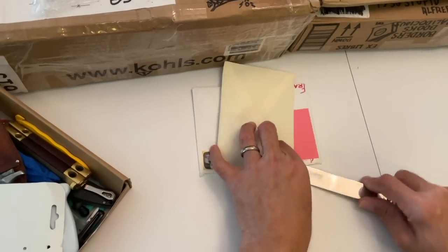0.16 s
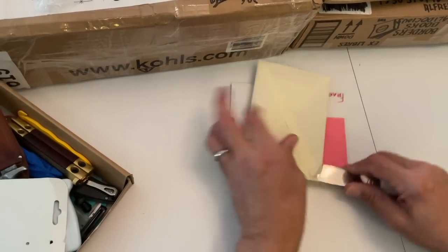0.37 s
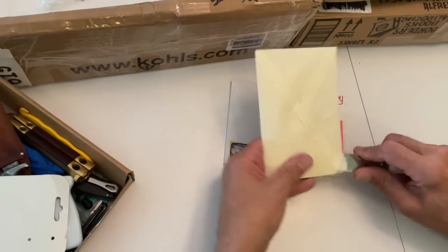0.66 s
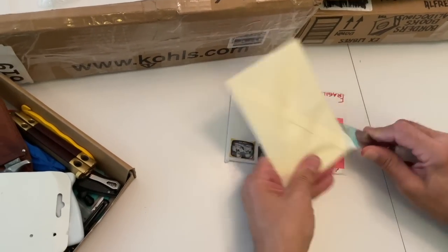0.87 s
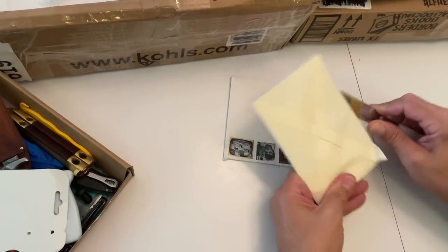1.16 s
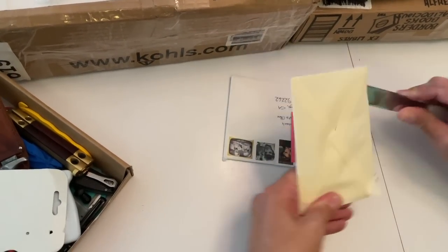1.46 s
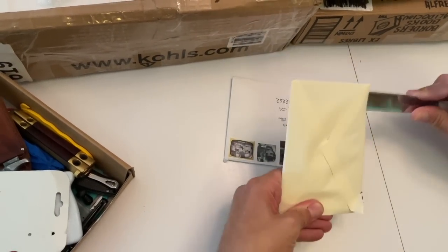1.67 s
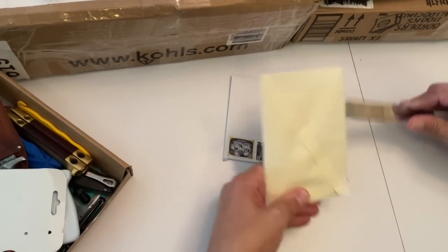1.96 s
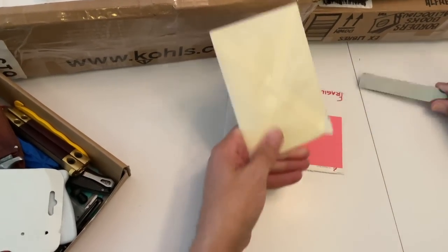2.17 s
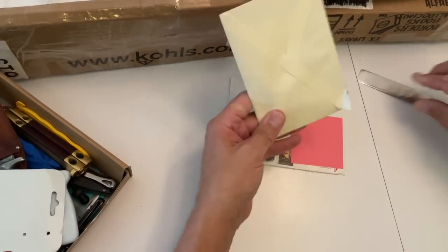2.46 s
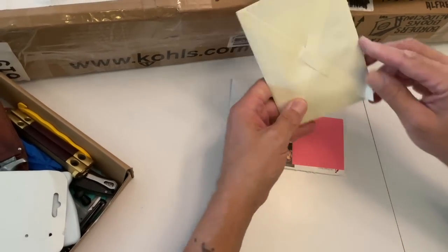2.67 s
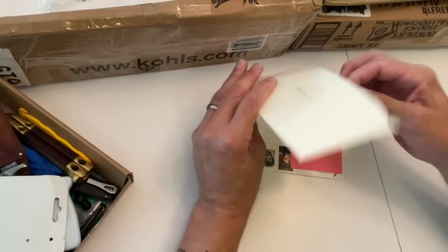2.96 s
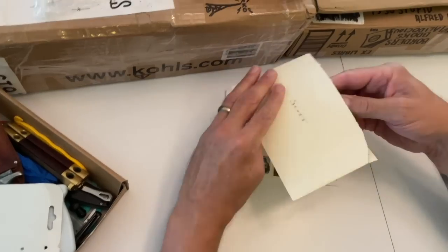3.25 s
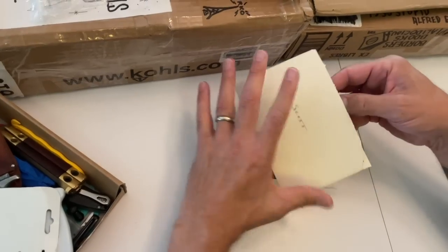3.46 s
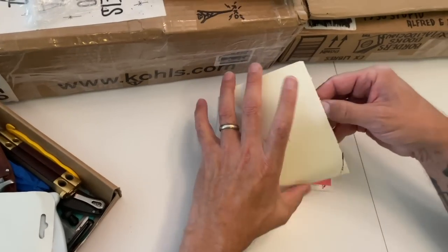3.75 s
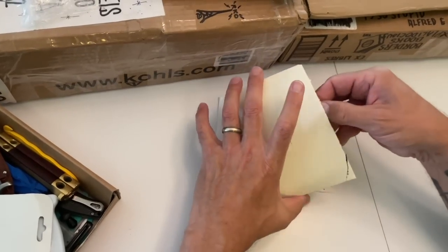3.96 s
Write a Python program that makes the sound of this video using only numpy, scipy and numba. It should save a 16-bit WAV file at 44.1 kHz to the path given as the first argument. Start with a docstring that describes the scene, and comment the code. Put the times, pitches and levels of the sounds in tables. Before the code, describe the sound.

Close up in a small quiet room, a thin blade rips an envelope in quick uneven rasps, thickest around one second. After a brief paper pop, the blade is dropped on a table with bright clinks and woody knocks. Then the envelope is turned, flexing with crisp snaps and light rustle over a faint low rumble.

```python
"""Letter opener and envelope

A flat steel letter opener saws an envelope open in jerks: rubbed and torn fibres drive resonances of the sheet.
The blade is dropped and bounces, so micro-contacts ring the damped modes of steel and table top.
Fingers turn the envelope, which slides and snaps as the sheet buckles.
Low resonant noise rumbles in a small room, which returns a short diffuse tail; the microphone is close."""
import sys
import numpy as np
from scipy import signal
from scipy.io import wavfile
from scipy.ndimage import uniform_filter1d
from numba import njit

SR = 44100
rng = np.random.default_rng(int(sys.argv[2]) if len(sys.argv) > 2 else 0)


def generate_wav(signal):
    """Clip the signal to [-1, 1] and save it as 16-bit WAV at the path in sys.argv[1]."""
    frames = np.transpose(np.atleast_2d(signal))
    scaled = np.clip(frames, -1, 1) * 32767
    pcm = np.round(scaled).astype(np.int16)
    wavfile.write(sys.argv[1], SR, pcm)


N = 181515  # length in samples

# low noise of the house: (time [s], level [dB])
RUMBLE_LEVEL = [(0.0, -44), (0.31, -40), (0.82, -45), (2.07, -43), (2.21, -36), (2.39, -46), (2.53, -46),
                (2.59, -42), (3.55, -40), (4.11, -44.5)]
# broad resonances of that noise: (centre [Hz], width [Hz], level [dB])
RUMBLE_RESONANCES = [(30.2, 20, -25.5), (58.6, 33, -7), (83.6, 27.6, -2.5), (117.2, 31, -5.5),
                     (155.5, 53, -6), (227, 115, -12.5)]
# the blade meets the table:
# (time [s], clack [dB], steel ring [dB], table knock [dB], dense first contact [ms])
BOUNCES = [(2.164, -13, -6.5, -15.5, 4.5), (2.195, 3.5, -27, -10.5, 4.8), (2.209, -11, -29, -6.5, 8.2),
           (2.269, -20, -40, -39, 8), (2.297, -13.5, -48, -13.5, 3.6), (2.408, -31, -5.5, -22.5, 19.5),
           (2.458, -26, -11.5, -17, 13.4), (2.483, -26, -14, -17, 12), (2.504, -7.5, -38, 0.5, 5.2),
           (2.517, -14, 4.5, -9, 6.2), (2.613, -24, -13, -18, 3.2), (2.625, -36, -25, -19, 2.14),
           (2.722, -52, -45, -31, 4), (2.805, -54, -44, -37, 5), (2.853, -55, -53, -35.5, 5)]
# modes of the blade, before its decay and gain factors: (frequency [Hz], width [Hz], level [dB])
STEEL_MODES = [(3520, 43, -11), (4210, 99, -14), (4750, 200, -11), (5310, 63, -12), (6260, 39, -14),
               (6890, 53, -2), (7360, 56, -8), (7780, 38, -7), (8770, 84, -13), (9520, 57, -14),
               (9870, 39, -6), (10800, 57, -12), (12200, 96, -4), (12500, 140, -12), (12700, 59, -12),
               (13700, 79, 0), (14500, 47, -18), (15200, 110, -11)]
# modes of the table top, before its decay factor: (frequency [Hz], width [Hz], level [dB])
TABLE_MODES = [(285.5, 27, 4), (571, 39, -2.5), (870, 19.3, -8), (1176, 39, -3), (1498, 52, -2),
               (1818, 40, -6.5), (2080, 69, -7.5), (2390, 92, -11.5), (2890, 110, -21)]
# the sheet buckles: (time [s], level [dB], centre of the modes [Hz], crack [dB re level], thump [dB re level]);
# fixed offsets are added to crack and thump
SNAPS = [(0.02, -24.5, 1434, -13, -21), (0.28, -21.5, 1590, 1.5, -3.5), (0.298, -24.5, 1420, 0, -17),
         (0.548, -28, 2300, -15, -23), (0.578, -15, 1180, -14, -26), (1.895, -18, 735, -9.5, -26),
         (1.972, -25, 1360, -19, -10), (2.002, -8.5, 846, -10, -40), (2.898, -13, 1204, -47, -14.5),
         (3.016, -7, 1200, -24, -16), (3.059, -11.5, 1517, -4, -34), (3.087, -10, 950, -10, -39),
         (3.197, -22, 1380, -37, -20), (3.282, -25.5, 1740, -10, -20), (3.324, -13.5, 770, -26, -19.5),
         (3.479, -22.5, 720, -21, -23), (3.518, -20.5, 1944, -40, -18), (3.553, -17.5, 1036, -17, -12.5),
         (3.57, -26, 935, -11, -14), (3.612, -21.5, 1590, -33, -16), (3.784, -15.5, 1737, -31, -30),
         (3.92, -22.5, 1027, -23, -21), (4.026, -8, 1675, -15, -31.5), (4.101, -8.5, 1215, -3.5, -40)]
# paper sliding on paper, skin and steel:
# (time [s], level [dB], body of the sheet [dB re level], fine hiss [dB re level])
SLIDE = [(0.0, -44.5, -4, -6), (0.165, -58.5, -5, -9), (0.301, -28, -9.5, -0.5), (0.41, -58, -7.5, -5),
         (0.47, -44, -18, -2.5), (0.54, -50.5, -23, -2), (0.6, -35.5, -13, -4), (0.68, -36, -15, -4.5),
         (0.75, -44.5, -9.5, -5), (1.1, -39, -1, -5.5), (1.21, -49, -1.5, -10), (1.45, -43.5, -2.5, -8),
         (1.79, -49, -2.5, -7.5), (1.83, -61, -3, -7), (2.05, -53.5, 2, -11), (2.15, -41, -16, -1),
         (2.36, -53, -1, -8), (2.72, -51, -4, -6), (2.85, -59.5, 0.5, -6.5), (2.97, -42.5, 1, -4),
         (3.12, -38.5, -1, -7), (3.22, -48, 2.5, -10), (3.3, -41.5, -3.5, -8), (3.43, -52, -6, -10),
         (3.5, -48.5, 2, -10), (3.76, -49, -5.5, -10), (3.83, -44.5, -10, 2), (3.94, -49, 0, -11),
         (4.112, -30.5, -12.5, -3)]
# jerks of the blade and tugs at the sheet: (start [s], length [ms], level [dB], body [dB re level])
JERKS = [(0.06, 58.6, -31, -9), (0.179, 24, -45.5, -2), (0.55, 20.6, -32, -7.5), (0.768, 75, -20.5, -4.5),
         (0.872, 19, -33.5, -11), (0.996, 31.4, -21.5, -8), (1.024, 19, -17, -9), (1.05, 16, -15.5, -10),
         (1.064, 24.4, -14, -19), (1.1, 15.7, -13, -13.5), (1.12, 20.3, -19.5, -11),
         (1.137, 43.5, -23.5, -8), (1.24, 18, -34.5, -4.5), (1.262, 130, -25, -6.5), (1.432, 31, -39.5, -5),
         (1.477, 11.9, -19.5, -7), (1.523, 14, -32, -3), (1.568, 16, -39.5, -1.5), (1.601, 18, -28.5, -6),
         (1.636, 16.6, -23.5, -10), (1.655, 12.5, -18, -8.5), (1.672, 24.7, -21, 2), (1.913, 63, -30, 0.5),
         (3.143, 24, -40, 7), (3.336, 8.5, -30.5, -6), (3.488, 18, -37.5, 7)]
# relative colour of rubbed and torn paper: (frequency [Hz], density [dB per Hz])
PAPER_COLOUR = [(150, -15.5), (400, -6.5), (750, -6), (1400, -6), (2300, -4), (4400, -9), (5700, -14.5),
                (6900, -15.5), (8600, -28), (12800, -16), (15500, -28)]

ROOM_T60_S, ROOM_DB = 0.15, -16
TOP_HZ = 15900  # upper limit of the microphone
RUMBLE_WAVER_DB = 1
# the steel rings shorter while the hand still holds it
LET_GO_S, HELD_SHARE = 2.35, 0.64
SHIMMER_DB = -18  # re steel ring
SNAP_T60_S, TICK_DB = 0.024, -9.5  # decay at the centre of the modes; tick re crack
# a jerk is an arch, blunter for a smaller power; its fine hiss is re level
JERK_POWER, JERK_HISS_DB = 0.5, -8
SLIDE_GRAIN_DB, TEAR_GRAIN_DB = 2.2, 3  # spread of fibre sizes


def undb(db):
    """Amplitude ratio from its logarithmic level."""
    return 10 ** (np.asarray(db) / 20)


def unit(x):
    """Normalisation to unit RMS."""
    return x / np.sqrt(np.mean(x ** 2))


def band(x, lo_hz, hi_hz):
    """Band limitation by a Butterworth filter."""
    return signal.sosfilt(signal.butter(2, [lo_hz, hi_hz], "band", fs=SR, output="sos"), x)


@njit
def resonate(x, hz, width):
    """Resonance with a moving centre: a state-variable band-pass; width is a share of the centre."""
    y, b, l = np.empty(len(x)), 0., 0.
    for i in range(len(x)):
        g = np.tan(np.pi * hz[i] / SR)
        v = (b + g * (x[i] - l)) / (1 + g * (g + width))
        b, l, y[i] = 2 * v - b, l + 2 * g * v, width * v
    return y


def resonate_twice(x, hz, width):
    """Two equal resonances in cascade, for steeper skirts."""
    return resonate(resonate(x, hz, width), hz, width)


def walk(rate):
    """Random fluctuation: levels held 1 / rate s and slewed twice; spread near 1."""
    k = int(SR / rate)
    steps = np.repeat(rng.standard_normal(N // k + 1), k)
    return 1.63 * uniform_filter1d(uniform_filter1d(steps, k), k)[:N]


def add(out, s, x):
    """Superposition of an event at time s."""
    i = int(s * SR)
    out[i:i + len(x)] += x[:N - i]


def ring(hz, t60, gain, t):
    """Modal superposition: a sum of damped modes, scaled to peak 1."""
    decay = np.exp(-np.log(1000) * t[:, None] / t60)
    y = (gain * np.sin(2 * np.pi * hz * t[:, None]) * decay).sum(1)
    return y / np.abs(y).max()


def mode_t60(width):
    """Reciprocity of resonance width and decay time."""
    return np.log(1000) / (np.pi * width)


def rumble():
    """Resonant filtering: low noise of the house in a few broad resonances."""
    x = np.zeros(N)
    for hz, width, db in RUMBLE_RESONANCES:
        centre = np.full(N, 1. * hz)
        x += undb(db) * unit(resonate_twice(rng.standard_normal(N), centre, width / hz))
    s, db = np.transpose(RUMBLE_LEVEL)
    return unit(x) * undb(np.interp(np.arange(N) / SR, s, db) + RUMBLE_WAVER_DB * walk(10))


def room(near):
    """Diffuse reverberation: the walls return a band-limited noise tail that builds up and decays."""
    t = np.arange(int(.4 * SR)) / SR
    tail = band(rng.standard_normal(len(t)), 100, 11000)
    tail *= np.exp(-np.log(1000) * t / ROOM_T60_S) * (1 - np.exp(-t / 0.0039))
    return signal.fftconvolve(near, tail / np.sqrt(np.sum(tail ** 2)))[:N]


def contact(ms, t):
    """Impact as micro-contacts: a dense first contact, then a fading chatter that roughens the modes."""
    touch = rng.standard_normal(len(t)) * undb(3.93 * rng.exponential(size=len(t)))
    touch *= (t < max(ms, 1) / 1000) + 0.23 * np.exp(-t / 0.046) + 1.6 * np.exp(-t / 0.0012)
    return touch / np.sqrt(np.sum(touch ** 2))


def steel_ring(share, t):
    """Modal ringing of the blade; holding it shortens the decay to the given share."""
    hz, width, db = np.transpose(STEEL_MODES)
    # the point of contact changes, so every blow favours other modes
    gain = width ** 0.59 * undb(db + 2.5 * rng.standard_normal(len(hz)))
    x = ring(hz, 2.0 * share * mode_t60(width), gain, t)
    # a dense shimmer of weak steel modes
    shimmer = band(rng.standard_normal(len(t)), 900, 16000) * np.exp(-t / (.018 * share))
    return x + undb(SHIMMER_DB) * shimmer


def table_knock(t):
    """Modal density of the table top: strong modes, with many weak ones between as decaying noise."""
    hz, width, db = np.transpose(TABLE_MODES)
    gain = undb(db + 1.1 * rng.standard_normal(len(hz)))
    strong = ring(hz, 1.13 * mode_t60(width), gain, t)
    return strong + 1.49 * band(rng.standard_normal(len(t)), 220, 1240) * np.exp(-t / 0.021)


def clack_noise(t):
    """Broadband impact noise: two treble bands with a sharp onset and a weak tail."""
    noise = rng.standard_normal((2, len(t)))
    treble = band(noise[0], 2700, 8050) + 0.15 * band(noise[1], 7700, 16000)
    return treble * (2.42 * np.exp(-t / 0.00042) + 0.11 * np.exp(-t / 0.013))


def blade():
    """Excitation by convolution: each bounce drives steel, table and clack with micro-contacts."""
    out, t = np.zeros(N), np.arange(int(.35 * SR)) / SR
    for s, clack_db, steel_db, table_db, ms in BOUNCES:
        share = HELD_SHARE if s < LET_GO_S else 1
        x = undb(steel_db) * steel_ring(share, t)
        x += undb(table_db) * table_knock(t)
        x += undb(clack_db) * clack_noise(t)
        add(out, s, signal.fftconvolve(x, contact(ms, t)))
    return band(out, 157, 20000)


def snaps():
    """Buckling: a short crack, a wide cluster of quickly damped sheet modes and a late push of air."""
    out, t = np.zeros(N), np.arange(int(.12 * SR)) / SR
    for s, db, hz, crack, thump in SNAPS:
        chance, noise = rng.standard_normal((2, 30)), rng.standard_normal((3, len(t)))
        modes = np.clip(hz * 2 ** (0.583 * chance[0]), 250, 5000)
        # high modes die slightly sooner
        t60 = SNAP_T60_S * (hz / modes) ** 0.067
        x = ring(modes, t60, np.sign(chance[1]), t) * (1 - np.exp(-t / 0.00058))
        # noise around and below the central pitch
        x += undb(-0.5) * band(noise[2], hz / 2.58, hz * 1.11) * np.exp(-t / 0.0065)
        burst = noise * np.exp(-t / 0.0016) * (1 - np.exp(-t / 0.0007))
        x += undb(crack + 10.5) * band(burst[0], 2000, 5670)
        x += undb(crack + 10.0 + TICK_DB) * band(burst[1], 10400, 14400)
        push = t / 0.0032 * np.exp(1 - t / 0.002)
        x += undb(thump + 9.5) * np.sin(2 * np.pi * 260 * t) * push
        add(out, s, undb(db) * x)
    return out


def fibres(spread_db):
    """Granular friction: fibres let go one by one in dense clicks of very unequal size."""
    return unit(rng.standard_normal(N) * undb(spread_db * rng.exponential(size=N)))


def slide_levels():
    """Sliding friction: amplitudes of body, middle and hiss over time."""
    s, db, body, hiss = np.transpose(SLIDE)
    return [undb(np.interp(np.arange(N) / SR, s, c)) for c in (db + body, db, db + hiss)]


def tear_levels():
    """Intermittent tearing: each jerk adds an arch to the amplitudes of body, middle and hiss."""
    tear = np.zeros((3, N))
    for start, ms, db, body in JERKS:
        arch = np.sin(np.linspace(0, np.pi, int(ms * SR / 1000))).clip(0) ** JERK_POWER
        for row, row_db in zip(tear, (db + body, db, db + JERK_HISS_DB)):
            add(row, start, undb(row_db) * arch)
    return tear


def paper():
    """Source and resonator: sliding and tearing excite wandering resonances of the sheet."""
    slide, tear = slide_levels(), tear_levels()
    # the edge catches and frees itself: every few milliseconds in tearing, more slowly in sliding
    smooth = fibres(SLIDE_GRAIN_DB) * undb(1.8 * walk(90))
    torn = fibres(TEAR_GRAIN_DB) * undb(1.8 * walk(500))
    colour_hz, colour_db = np.transpose(PAPER_COLOUR)
    out = np.zeros(N)
    # body, middle and hiss [Hz]
    for k, (lo, hi) in enumerate([(200, 1300), (1300, 8600), (8600, 16000)]):
        drive = slide[k] * smooth + tear[k] * torn
        part, power = np.zeros(N), 0
        # four resonances per octave, with alternating sign
        for j, hz in enumerate(lo * 2 ** np.arange(1 / 8, np.log2(hi / lo), 1 / 4)):
            gain = undb(np.interp(np.log(hz), np.log(colour_hz), colour_db))
            centre = hz * (1 + .02 * walk(30))
            flicker = undb(2.14 * walk(60))
            part += gain * flicker * (-1) ** j * resonate_twice(drive, centre, 0.23)
            power += gain ** 2 * hz * .5 / SR
        out += part / np.sqrt(power)
    return out


def scene():
    """Superposition of near sources, their reverberation and the background."""
    near = paper() + snaps() + blade()
    return (near + undb(ROOM_DB) * room(near) + rumble())[None]


def record(dry):
    """Microphone response: the port has a dip in the treble, and the top is cut."""
    x = dry[0] - 0.47 * resonate(dry[0], np.full(N, 8650.), 0.16)
    return signal.sosfilt(signal.ellip(8, .2, 70, TOP_HZ, fs=SR, output="sos"), x)[None]


dry = scene()
out = record(dry)
generate_wav(out)
```